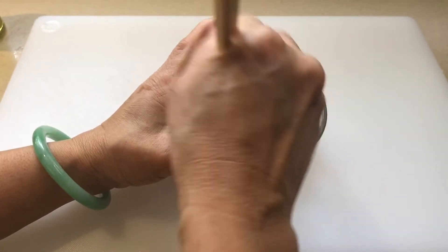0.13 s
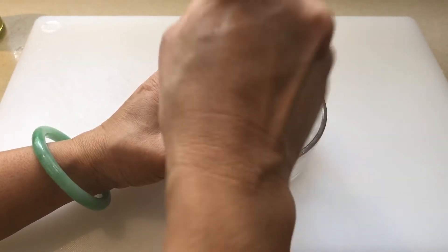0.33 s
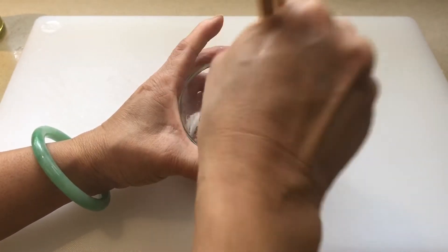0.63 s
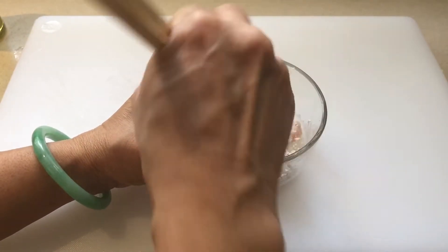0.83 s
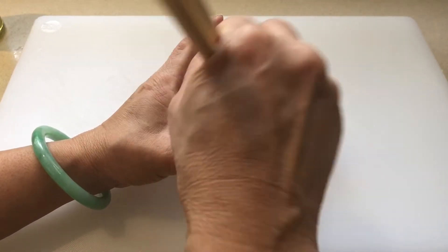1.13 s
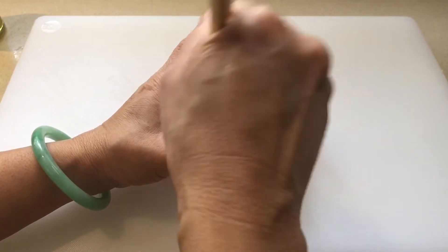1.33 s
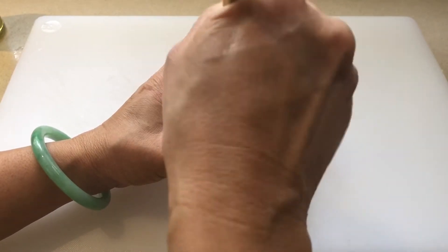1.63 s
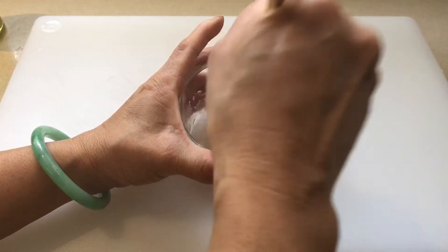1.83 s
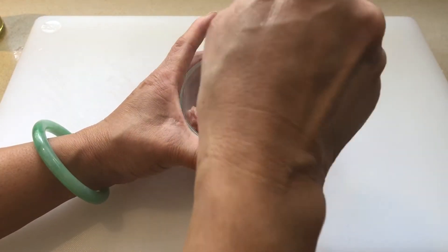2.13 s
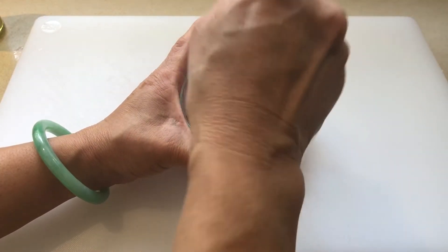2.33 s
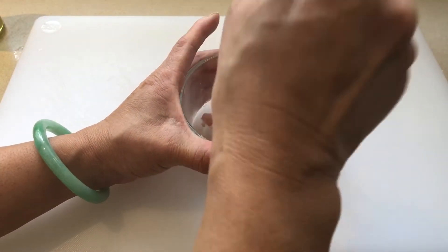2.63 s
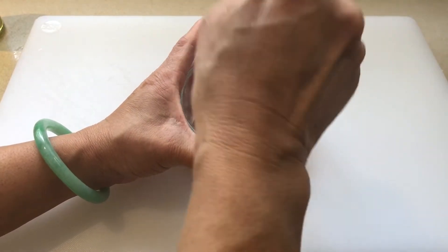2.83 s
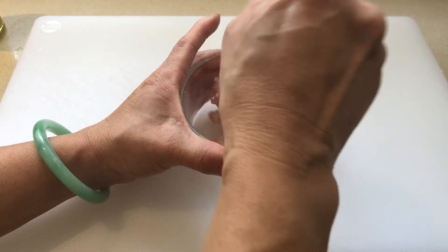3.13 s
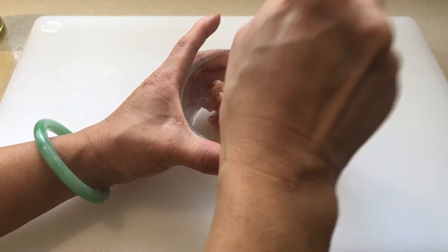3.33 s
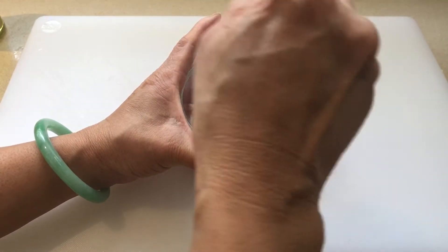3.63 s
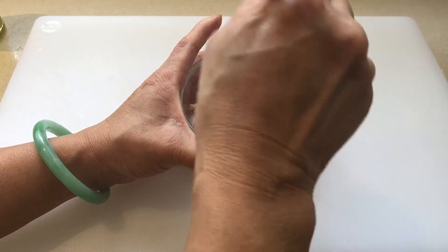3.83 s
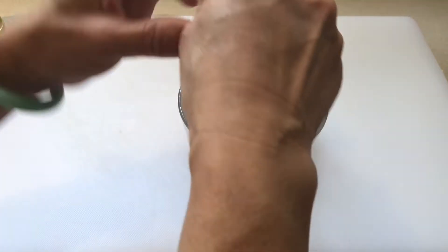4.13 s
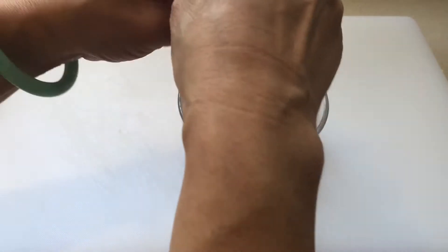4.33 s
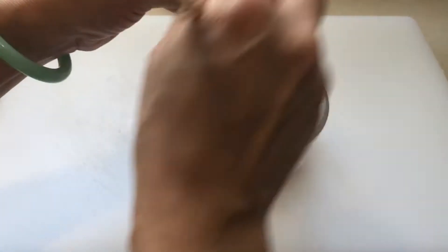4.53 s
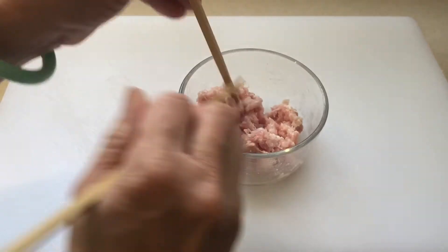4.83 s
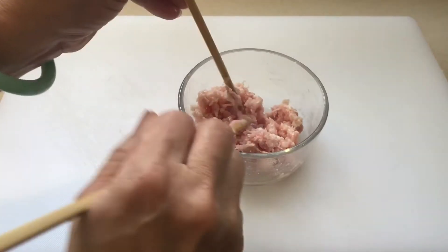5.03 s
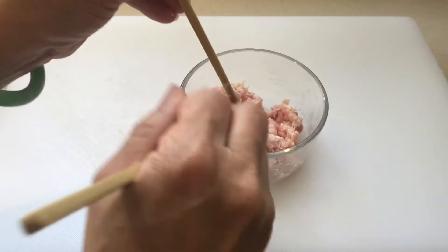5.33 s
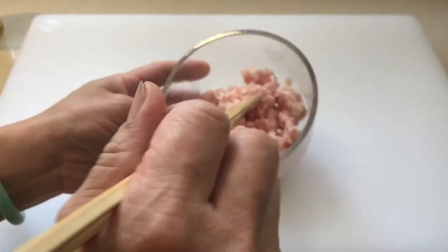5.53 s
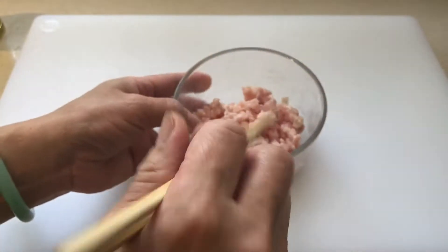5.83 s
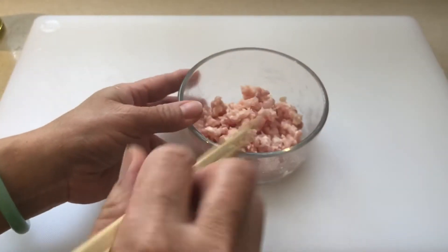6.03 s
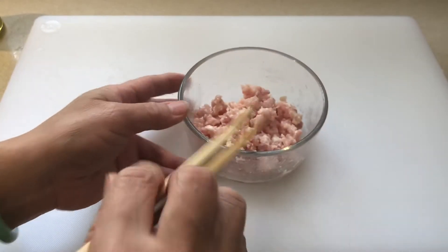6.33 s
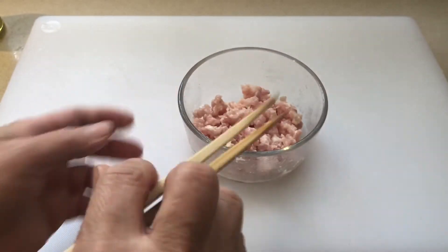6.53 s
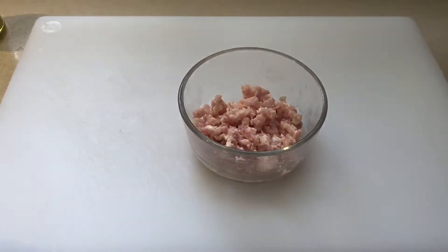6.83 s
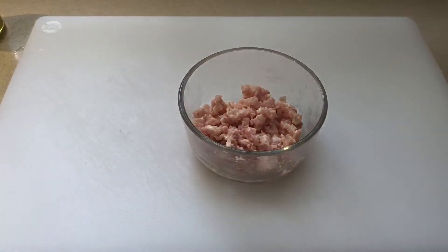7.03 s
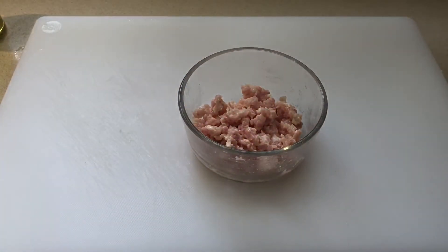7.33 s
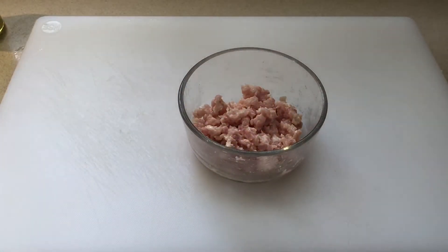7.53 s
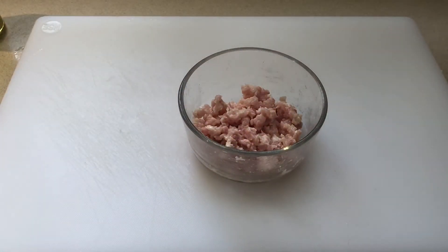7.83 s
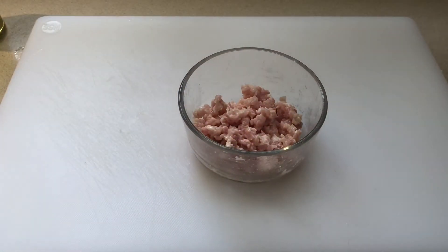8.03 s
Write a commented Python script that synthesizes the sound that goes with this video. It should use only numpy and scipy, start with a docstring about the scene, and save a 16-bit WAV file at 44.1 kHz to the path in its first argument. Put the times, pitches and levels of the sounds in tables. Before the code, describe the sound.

Close up in a quiet kitchen, chopsticks work sticky minced meat in a small glass bowl on a plastic board: faint wet squelches, tiny ticks and dull knocks several times a second. A short lull, then sticks scrape together and tap the bowl. Three loud, bright glass clinks follow near six seconds. After near silence, utensils clatter in something hollow a little way off.

```python
"""Chopsticks stir minced meat in a small glass bowl on a plastic board, heard close by in a quiet kitchen.
The tips excite resonances of the bowl's floor and wall and, through the bowl, of the board and counter.
Small ticks and a wet squelch are filtered bursts, pops and noise; stick on stick is shaped, gritty noise.
At the end loose utensils clatter a little way off: noise bursts that excite light parts and a hollow box.
Sparse decaying echoes place these sounds in the room, over a faint hum and hiss."""
import sys
import numpy as np
from scipy import signal
from scipy.fft import rfft, irfft
from scipy.io import wavfile
from scipy.ndimage import uniform_filter1d

SR = 44100
rng = np.random.default_rng(int(sys.argv[2]) if len(sys.argv) > 2 else 0)


def waveform_to_disk(signal):
    """Save audio, clipped to [-1, 1], as 16-bit WAV at the path in sys.argv[1]."""
    frames = np.transpose(np.atleast_2d(signal))
    scaled = np.clip(frames, -1, 1) * 32767
    samples = np.round(scaled).astype(np.int16)
    wavfile.write(sys.argv[1], SR, samples)


N = 360297
T = np.arange(N) / SR  # s

# Room tone. Each row: frequency in Hz, relative spectral level in dB.
AIR_SPECTRUM = [(15, -71.5), (25, -26.5), (65, -4.5), (163, -5.5), (245, 0.5), (280, -7), (349, -6),
                (687, -17), (831, -18.5), (979, -20.5), (2900, -31), (14400, -37), (16500, -42.5)]
# Its drift. Each row: time in seconds, low hum in dB, hiss in dB.
AIR_DRIFT = [(0, -70, -72), (.7, -62, -74.5), (1.5, -69.5, -73.5), (3.4, -67, -74.5), (5.399, -67.5, -76),
             (6.499, -64, -72.5), (7.3, -70, -64.5), (8.17, -64, -67)]
# Faint wavering hums. Each row: frequency in Hz, width in Hz, level at first in dB, level once settled in dB.
HUMS = [(125, 15, -68, -70.5), (306, 25, -68, -78.5), (366, 23, -68, -93), (630, 31, -75.5, -80)]
SETTLE_S = 3.5

# Soft hissy strokes: sticks dragging through the meat, at the end perhaps being laid down.
# Each row: start in seconds, length in seconds, level in dB.
SOFT_STROKES = [(0, 0.072, -65), (.12, 0.31, -68.5), (.455, .12, -62), (.7, .16, -70.5), (.9, 0.18, -68),
                (1.03, 0.19, -59), (1.24, 0.19, -64.5), (1.51, 0.18, -65), (1.74, 0.2, -68.5),
                (2.04, 0.26, -66), (2.27, 0.2, -73), (2.55, 0.19, -67), (2.81, 0.14, -62.5),
                (3.04, 0.29, -68), (3.38, 0.43, -69), (3.72, 0.29, -70.5), (3.97, 0.11, -71.5),
                (5.89, 0.059, -72), (6.77, 0.067, -64), (6.85, 0.09, -61), (7.06, .03, -63)]
STROKE_PEAK, STROKE_EDGE = .35, 1.32  # place of the peak 0-1, softness of the ends
# Wet meat. Each row: frequency in Hz, relative spectral level in dB.
SQUELCH_SPECTRUM = [(710, -45.5), (1200, -6), (1310, -16), (2400, 0.5), (3250, 1), (5970, 0.5),
                    (14200, -0.5), (16000, -44)]
WET_HISS_DB = -3  # smooth hiss of the wet meat, against the pops
SCUFF_DB = -9.5  # bowl shuffling on the board, against the squelch
# Small bright ticks: sticky meat letting go, and the sharp clicks of some knocks.
# Each row: start in seconds, peak level in dB, pitch in Hz.
SMALL_TICKS = [(0.0386, -51, 4330), (0.0946, -41.5, 8400), (0.176, -51, 2800), (0.2556, -43, 4830),
               (0.2774, -45.5, 4800), (0.4562, -26, 6100), (0.783, -47, 3580), (0.8099, -42, 4140),
               (0.84, -44.5, 8900), (0.928, -47.5, 10300), (0.9393, -47, 5290), (0.9682, -47, 8860),
               (0.981, -48, 9700), (1.1197, -38.5, 3060), (1.1987, -49, 5370), (1.2685, -48, 7500),
               (1.3414, -46, 7450), (1.4504, -48, 5560), (1.586, -39, 6080), (1.6165, -39, 7050),
               (1.7507, -45, 7400), (1.7779, -29.5, 7300), (1.9027, -41.5, 7100), (1.9966, -41, 5650),
               (2.0889, -41, 2970), (2.1115, -42, 7250), (2.365, -44.5, 5010), (2.4477, -37.5, 6160),
               (2.6, -42.5, 7800), (2.6664, -53, 5870), (2.7746, -46.5, 9600), (3.238, -52, 8000),
               (3.494, -50, 3880), (3.5286, -40, 4190), (3.6101, -40, 3120), (3.6426, -46, 9500),
               (3.7359, -47, 5830), (3.8003, -43.5, 6030), (3.8716, -48, 11900), (5.2464, -49.5, 10700),
               (5.296, -47.5, 7930), (5.909, -51, 4190), (6.8906, -32.5, 5010)]

# Blows on the bowl, passed into the board. Each row: start in seconds, peak of the board in dB,
# of the tip in dB, of the counter thump in dB, tip pitch in Hz, glass floor ring in dB, its pitch in Hz.
BOWL_KNOCKS = [(0.213, -32, -56, -43, 2620, -73, 4870), (0.451, -26.5, -35.5, -36.5, 5070, -64, 4970),
               (0.719, -61, -52, -44, 3520, -77, 4870), (1.088, -31, -41, -43.5, 5300, -65, 4870),
               (1.348, -50, -60, -49.5, 4940, -68, 4870), (1.553, -21.5, -42, -39.5, 4130, -47, 4830),
               (1.779, -22, -45, -32, 3700, -48, 5100), (2.068, -62, -61, -56, 3300, -66, 4870),
               (2.259, -16.5, -13, -39, 3980, -25.5, 5210), (2.542, -18.5, -22.5, -38, 2840, -46, 4600),
               (2.811, -16, -25, -39.5, 4100, -30, 4840), (3.108, -19.5, -30.5, -42, 4330, -41, 4760),
               (4.054, -40, -67, -51, 3034, -84, 4870), (4.647, -37, -21.5, -69, 4750, -48, 5200),
               (4.776, -32, -26, -44.5, 3370, -37, 4870), (4.91, -60, -38.5, -65, 2840, -49, 4760),
               (5.016, -25.5, -23.5, -52, 2870, -34, 4870), (5.8, -71, -68, -46.5, 2610, -85, 4850),
               (6.103, -19, -9.5, -55, 3300, -39, 5000), (6.285, -26.5, -14, -55, 5410, -50.5, 4870),
               (6.416, -15, -39, -54.5, 5600, -46, 4870)]
# Resonances of the board. Each row: frequency in Hz, width in Hz, relative level in dB.
BOARD_MODES = [(330, 55, -5.5), (397, 11, -6), (657, 160, -1), (1180, 280, 3), (1578, 92, 3),
               (2220, 270, -5)]
# Resonances of the counter under the board. Each row: frequency in Hz, width in Hz, relative level in dB.
COUNTER_MODES = [(56.4, 19, 14.5), (134, 17, 5.5), (200, 25, -24)]
# The loose bowl drumming on the board. Each row: frequency in Hz, width in Hz, relative level in dB.
ROCKING_MODES = [(213, 35, 3), (320, 13, 8.5), (453, 61, -3)]
LOOSE_S = (4.0, 5.4)  # no hand holds the bowl between these times
ROCK_DB = -10.5  # against the board blow
TILT_DB = 0.34  # board treble gained per octave for each dB that the tip stands out

# Stick on glass wall. Each row: start in seconds, crack peak in dB, crack dullness 0-1, ring levels in dB
# of the four lowest wall modes, t60 in seconds of the second mode, t60 in seconds of the others before
# each mode's factor. The t60s are set by where hand and meat damp the wall.
WALL_CLINKS = [(1.029, -26, .1, -25.5, -32.5, -22, -33, 0.048, 0.021),
               (1.072, -35, 0.11, -48, -37.5, -52, -68, .1, .12),
               (2.06, -68.5, .5, -70.5, -63, -73.5, -82, 0.14, .2),
               (3.995, -69, 0.55, -53, -66, -56.5, -72, 0.59, 0.089),
               (4.031, -81.5, 0.84, -83, -59, -86, -88, 0.39, 0.22),
               (4.777, -30.5, 1, -69, -37.5, -43.5, -49, 0.16, 0.12),
               (4.819, -80, 0.55, -62.5, -83, -79, -93, .2, .5),
               (5.06, -77, .5, -62.5, -90, -82.5, -96.5, .2, 0.58),
               (5.016, -18.5, 0.88, -51, -27.5, -30.5, -37.5, 0.18, 0.071),
               (5.958, -47, 0.43, -61, -59, -69, -62, .06, 0.16),
               (6.102, -12.5, 0.2, -34, -27.5, -17.5, -33, 0.31, 0.054),
               (6.108, -7, 0.073, -56, -46, -41, -41, 0.27, 0.059),
               (6.286, -8, 0.27, -27.5, -36, -25, -44.5, 0.26, 0.068),
               (6.312, -35, 1, -50, -33, -43.5, -53, 0.89, 0.62),
               (6.415, -3.5, 0.3, -21.5, -17, -10, -17.5, 0.077, 0.056)]
# Glass wall modes, split in close pairs. Each row: upper frequency in Hz, split in Hz,
# index of the ring level used, offset from that level in dB, factor on t60.
GLASS_MODES = [(1325, 25, 0, 0, 1), (3092, 40, 1, 0, 1), (5398, 45, 2, 0, 1), (8242, 25, 3, 0, .8),
               (11610, 30, 3, -7, .55), (15490, 30, 3, -18, .5)]
# Bamboo struck flat. Each row: frequency in Hz, width in Hz, relative level in dB.
DULL_STICK_MODES = [(600, 83, -4.5), (942, 73, -9.5), (2255, 95, -1), (3470, 550, -28), (5230, 1500, -10)]
# Bamboo struck near the tip. Each row: frequency in Hz, width in Hz, relative level in dB.
BRIGHT_STICK_MODES = [(4400, 900, -3.5), (6500, 420, 5), (7960, 2900, 6), (9500, 540, -8),
                      (12330, 680, -22), (14400, 670, -21.5)]
FIRM_CRACK_DB, FIRM_TIP_DB = -16, -46  # touches above these stop a ring
LINGER_DB, LINGER_S = -27.5, 0.53  # a weak part of each ring escapes the damping; its t60 before the factor

# One stick wiped on the other. Each row: start in seconds, length in seconds, level in dB.
STICK_WIPES = [(4.665, 0.094, -49.5), (4.753, 0.039, -57), (4.9, 0.04, -52.5), (4.955, 0.063, -49)]
WIPE_PEAK, WIPE_EDGE = 0.39, 3.5  # place of the peak 0-1, softness of the ends
# Wood on wood. Each row: frequency in Hz, relative spectral level in dB.
SCRAPE_SPECTRUM = [(470, -59), (800, 2), (1030, -33.5), (1190, -29), (1810, 1), (3300, 2), (4400, 7),
                   (10300, 9), (16000, -0.5)]

# Utensils bumping. Each row: start in seconds, rattle noise in dB, box peak in dB, t60 of the rattle in seconds.
UTENSIL_BUMPS = [(7.452, -49.5, -58, 0.043), (7.483, -37.5, -30, 0.048), (7.611, -48, -33, 0.06),
                 (7.651, -32.5, -28, 0.096), (7.718, -30, -26.5, 0.08), (7.747, -33.5, -29.5, 0.085),
                 (7.789, -36, -44, 0.039), (7.835, -29.5, -33.5, 0.06), (7.872, -32, -36.5, 0.04),
                 (7.897, -32.5, -38, .06), (7.914, -33, -34, 0.11), (7.972, -43.5, -33, 0.15),
                 (8.025, -39, -40, 0.098), (8.08, -45.5, -40, 0.12), (8.128, -43.5, -37.5, 0.069),
                 (8.147, -38, -53, 0.053)]
# Rattle noise. Each row: frequency in Hz, relative spectral level in dB.
RATTLE_SPECTRUM = [(470, 3.5), (800, -28), (1280, 9), (2230, 1.5), (3300, 6), (4370, 2), (8120, 2),
                   (15100, -8.5), (16500, -34)]
# The hollow thing they lie in. Each row: frequency in Hz, width in Hz, relative level in dB.
BOX_MODES = [(432, 16, -11), (550, 108, -2.5), (613.4, 16, 3.5), (636.5, 17, 0.5), (808, 21, -4),
             (977, 26, -3), (1195, 25, -8.5), (1310, 51, -38), (1562, 10, 1), (2070, 71, -14)]
# The furniture under it. Each row: frequency in Hz, width in Hz, relative level in dB.
FURNITURE_MODES = [(74.7, 6.3, -6), (146.1, 2.6, 6), (195, 8.2, -8), (312.6, 8.6, -7.5)]
PARTS_HZ, PARTS_SPREAD = (3280, 6200), (.05, .18)  # typical pitches of two light parts, log spread of each
BOX_SPREAD = .04  # log spread of the box pitches between bumps
THUD_DB = -11  # against the box

# Reverberation. Each row: frequency in Hz, t60 in seconds.
ROOM_DECAY = [(60, 0.46), (300, 0.7), (1000, 0.46), (4000, 0.4), (8000, 0.33), (16000, 0.14)]
# The level dips briefly. Each row: centre in seconds, half length in seconds, depth in dB.
LEVEL_DIPS = [(2.028, 0.015, -23), (5.534, 0.026, -19)]
EDGE_HZ = 15950  # upper band limit


def gain_of(db):
    """Level law: decibels to amplitude gain."""
    return 10 ** (np.asarray(db) / 20)


def evened(x):
    """Normalisation of power: scales to rms 1."""
    return x / np.sqrt(np.mean(x ** 2) + 1e-20)


def peaked(x, db):
    """Normalisation of amplitude: scales to a peak level in dB."""
    return gain_of(db) * x / abs(x).max()


def read(points, hz):
    """Interpolation by straight lines on a log-frequency axis."""
    f, value = np.transpose(points)
    return np.interp(np.log(hz + 1), np.log(f + 1), value)


def add(mix, s, sound):
    """Superposition: adds a sound into the mix at time s, in place."""
    part = mix[round(s * SR):][:len(sound)]
    part += sound[:len(part)]


def coloured(x, spectrum):
    """Spectral shaping: weights x by a spectrum, then scales to rms 1."""
    weight = gain_of(read(spectrum, np.fft.rfftfreq(len(x), 1 / SR)))
    return evened(irfft(rfft(x) * weight, len(x)))


def resonances(x, modes):
    """Modal superposition: a sum of one-pole resonances, each of peak gain 1 before its level."""
    out = 0
    for hz, width, db in modes:
        pole = np.exp((2j * np.pi * hz - np.pi * width) / SR)
        out = out + gain_of(db) * 2 * signal.lfilter([1 - abs(pole)], [1, -pole], x).real
    return out


def envelope(strokes, peak, edge):
    """Amplitude modulation: each stroke swells to its peak and dies away."""
    bend = np.log(.5) / np.log(np.clip(peak, .05, .95))  # warps time so the sine crests at the peak
    level = 0
    for s, length, db in strokes:
        progress = np.clip((T - s) / length, 0, 1)
        level = level + gain_of(db) * np.sin(np.pi * progress ** bend).clip(0) ** edge
    return level


def air():
    """Stationary noise split at 1500 Hz into hum and hiss, each drifting alone, with narrow-band hums."""
    s, hum_db, hiss_db = np.transpose(AIR_DRIFT)
    noise = coloured(rng.standard_normal(N), AIR_SPECTRUM)
    low = signal.sosfiltfilt(signal.butter(1, 1500, fs=SR, output="sos"), noise)
    out = evened(low) * gain_of(np.interp(T, s, hum_db))
    out += evened(noise - low) * gain_of(np.interp(T, s, hiss_db))
    for hz, width, first_db, settled_db in HUMS:
        tone = evened(resonances(rng.standard_normal(N), [(hz, width, 0)]))
        out += gain_of(np.interp(T, [0, SETTLE_S], [first_db, settled_db])) * tone
    return out


def squelch():
    """Random impulse train: dense small pops of wandering pitch follow the soft strokes, with hiss and scuff."""
    size = gain_of(5.0 * np.minimum(rng.exponential(1, N), 4))
    size *= rng.random(N) < 1000 / SR  # about 1000 pops a second
    size *= rng.choice([-1, 1], N)
    kind = rng.integers(0, 8, N)  # each pop takes one of eight pitches
    pops = np.zeros(N)
    for k, hz in enumerate(np.geomspace(2300, 12000, num=8)):
        pops += resonances(size * (kind == k), [(hz, .3 * hz, 0)])
    wet = evened(pops) + gain_of(WET_HISS_DB) * rng.standard_normal(N)
    scuff = gain_of(SCUFF_DB) * evened(resonances(wet, BOARD_MODES))  # the bowl shuffles on the board
    return (coloured(wet, SQUELCH_SPECTRUM) + scuff) * envelope(SOFT_STROKES, STROKE_PEAK, STROKE_EDGE)


def small_ticks():
    """Impulsive excitation: each tick is a short noise burst through two broad resonances."""
    out, size = np.zeros(N), 400
    for s, db, hz in SMALL_TICKS:
        burst = rng.standard_normal(size) * gain_of(-60 * T[:size] / .009)
        pop = resonances(resonances(burst, [(hz, 3500, 0)]), [(hz, 2500, 0)])
        add(out, s, peaked(pop + .05 * burst, db))
    return out


def swept(x, spread):
    """Dispersion: bending waves carry treble faster, delay = spread * (1/sqrt(Hz) - 1/sqrt(5000))."""
    hz = np.fft.rfftfreq(len(x), 1 / SR)
    phase = -4 * np.pi * spread * (np.sqrt(hz) - hz / np.sqrt(5000) / 2)
    delayed = irfft(rfft(x) * np.exp(1j * phase))
    return delayed * (np.arange(len(x)) < len(x) - 500)  # drops what wraps round to the end


def knocks():
    """Impact excitation: tip and glass floor click at once; board and counter follow as a falling sweep."""
    out, size = np.zeros(N), 16384
    for s, board_db, tip_db, thump_db, tip_hz, floor_db, floor_hz in BOWL_KNOCKS:
        blow = (0.82 + rng.standard_normal(size)) * gain_of(-60 * T[:size] / 0.0013)
        tilt_db = TILT_DB * np.clip(tip_db - board_db + 8.5, -20, 10)
        # each blow weights the board modes a little differently
        spot = [(hz, width, db + 1.5 * z + tilt_db * np.log2(hz / 900))
                for (hz, width, db), z in zip(BOARD_MODES, rng.standard_normal(len(BOARD_MODES)))]
        if LOOSE_S[0] < s < LOOSE_S[1]:
            add(out, s, peaked(resonances(blow, ROCKING_MODES), board_db + ROCK_DB))
        board = swept(peaked(resonances(blow, spot), board_db), spread=0.1415)
        low_blow = resonances(blow, [(70, 110, 0)])
        thump = swept(peaked(resonances(low_blow, COUNTER_MODES), thump_db), spread=0.24)
        tip = resonances(blow, [(tip_hz, 1700, 0)])
        tip = resonances(tip, [(tip_hz, 1500, 0), (9300, 1500, -4)])
        floor = resonances(blow, [(floor_hz, 900, 0)])
        floor = resonances(floor, [(floor_hz, 100, 0), (.93 * floor_hz, 250, -9)])  # thick glass damped by meat
        add(out, s, board + thump + peaked(tip, tip_db) + peaked(floor, floor_db))
    return out


def stick_crack(size, dull):
    """Modal excitation of bamboo: a noise burst mixed between flat-struck and tip-struck resonances."""
    blow = rng.standard_normal(size) * gain_of(-60 * T[:size] / 0.011)
    blow = signal.sosfilt(signal.butter(2, 350, "high", fs=SR, output="sos"), blow)
    dull = np.clip(dull, 0, 1)
    flat = peaked(resonances(blow, DULL_STICK_MODES), 0)
    bright = peaked(resonances(blow, BRIGHT_STICK_MODES), 0)
    return dull * flat + (1 - dull) * bright


def clinks():
    """Mode splitting and damping: after the crack, paired wall modes ring until the next firm touch."""
    cracks, rings, t = np.zeros(N), np.zeros(N), T[:SR // 2]
    firm = [row[0] for row in WALL_CLINKS if row[1] > FIRM_CRACK_DB]
    firm += [row[0] for row in BOWL_KNOCKS if row[2] > FIRM_TIP_DB]
    for s, crack_db, dull, *ring_db, second_t60, other_t60 in WALL_CLINKS:
        end = min([touch for touch in firm if touch > s + .015] + [N / SR])
        add(cracks, s, peaked(stick_crack(len(t), dull), crack_db))
        stop = np.clip((end - s - t) / 0.008, 0, 1)
        for (hz, split_hz, which, db, factor), turn in zip(GLASS_MODES, rng.random(len(GLASS_MODES))):
            which = int(which)
            pair = np.sin(2 * np.pi * hz * t)
            pair += .12 * np.sin(2 * np.pi * ((hz - split_hz) * t + turn))
            t60 = factor * max(second_t60 if which == 1 else other_t60, .02)
            fall = gain_of(-60 * t / t60) + gain_of(LINGER_DB - 60 * t / (factor * LINGER_S))
            swell = np.minimum(t * hz / 0.93, 1)  # builds over about one cycle
            add(rings, s, gain_of(ring_db[which] + db) * fall * pair * swell * stop)
    return cracks, rings


def scrape():
    """Friction noise: wood grain sliding on wood grain gives a slightly gritty hiss."""
    grit_db = 1.0 * evened(uniform_filter1d(rng.standard_normal(N), 60))
    grit = rng.standard_normal(N) * gain_of(grit_db)
    return coloured(grit, SCRAPE_SPECTRUM) * envelope(STICK_WIPES, WIPE_PEAK, WIPE_EDGE)


def clatter():
    """Coupled resonators: each bump shakes light parts, drums on the box and thuds into the furniture."""
    out, t = np.zeros(N), T[:SR // 2]
    for s, db, box_db, t60 in UTENSIL_BUMPS:
        low_hz, high_hz = PARTS_HZ * np.exp(PARTS_SPREAD * rng.standard_normal(2))
        fall_db = -60 * t / max(t60, .02)
        lumps = gain_of(3.5 * evened(uniform_filter1d(rng.standard_normal(len(t)), 120)))
        shake = rng.standard_normal((3, len(t))) * lumps * np.minimum(t / 0.0029, 1)
        # every bump meets the box at slightly different pitches and levels
        walls = [(hz * np.exp(BOX_SPREAD * y), width, level + 3 * z)
                 for (hz, width, level), (y, z) in zip(BOX_MODES, rng.standard_normal((len(BOX_MODES), 2)))]
        rattle = coloured(shake[0], RATTLE_SPECTRUM) * gain_of(db + fall_db)
        rattle += gain_of(6.5) * resonances(rattle, [(low_hz, 260, -3), (high_hz, 350, 1.5)])
        drum = peaked(resonances(shake[1] * gain_of(0.7 * fall_db), walls), box_db)
        low_shake = resonances(shake[2] * gain_of(0.63 * fall_db), [(169, 210, 0)])
        thud = peaked(resonances(low_shake, FURNITURE_MODES), box_db + THUD_DB)
        add(out, s, rattle + drum + thud)
    return out


def kitchen(x):
    """Reverberation: sparse echoes of random sign, each band dying at its own speed, in four patterns."""
    out, at = np.zeros(N), np.arange(160, SR - 20, 20)
    # the echo pattern changes every 0.13 s, so that no single comb colours the sound
    turn = np.floor(T / .13) % 4
    for k in range(4):
        taps = np.zeros(SR)
        taps[at + rng.integers(0, 20, len(at))] = rng.choice([-1., 1.], len(at))
        hz, t, bands = signal.stft(taps, SR, nperseg=512)
        decay = gain_of(-60 * t / read(ROOM_DECAY, hz)[:, None])
        tail = signal.istft(bands * decay, SR, nperseg=512)[1]
        share = np.sqrt(abs(uniform_filter1d((turn == k) * 1., size=2000)))  # crossfade of equal power
        out += signal.fftconvolve(x * share, tail / np.linalg.norm(tail))[:N]
    return out


def scene():
    """Superposition of the direct sounds, their reverberation and the room tone."""
    room_tone = air()
    soft = squelch() + small_ticks() + scrape()
    board = knocks()
    cracks, rings = clinks()
    far = clatter()
    to_room = gain_of(-15.5) * cracks + gain_of(-15) * rings + gain_of(-12.5) * board
    to_room += gain_of(-15) * soft + gain_of(-4.5) * far
    return (cracks + rings + board + soft + far + kitchen(to_room) + room_tone)[None]


def record(dry):
    """Linear filtering after brief dips in level: a bass cut and an upper band limit."""
    dip_db = sum(db * np.clip(1 - abs(T - s) / half, 0, 1) for s, half, db in LEVEL_DIPS)
    x = signal.sosfilt(signal.butter(4, 45, "high", fs=SR, output="sos"), dry * gain_of(dip_db))
    band_limit = signal.firwin(127, EDGE_HZ, window=("kaiser", 9), fs=SR)
    return signal.oaconvolve(x, band_limit[None], "same")


dry = scene()
out = record(dry)
waveform_to_disk(out)
```